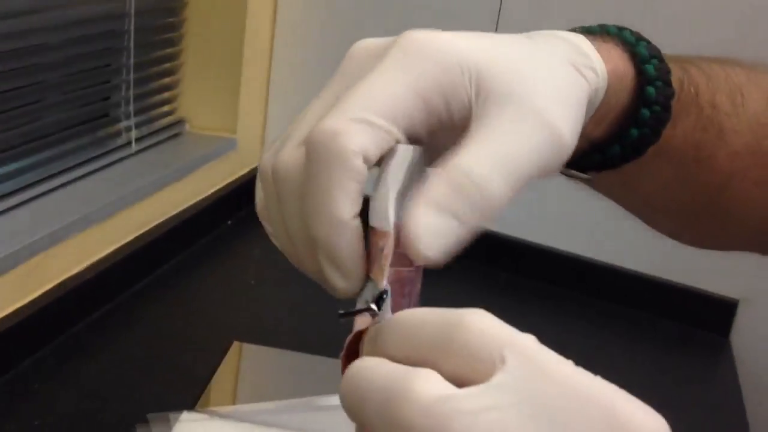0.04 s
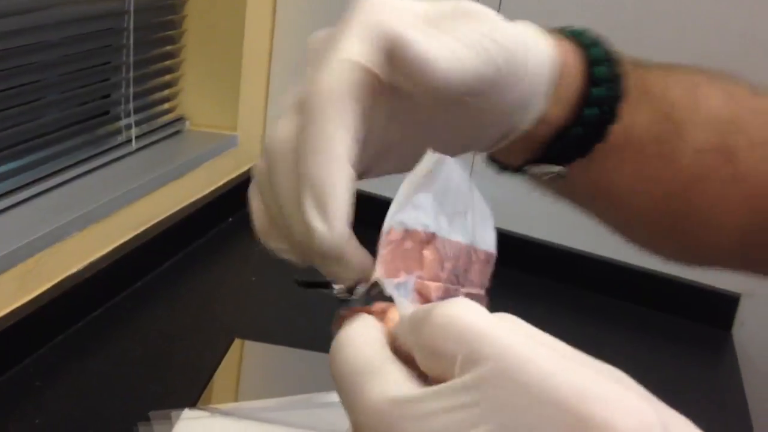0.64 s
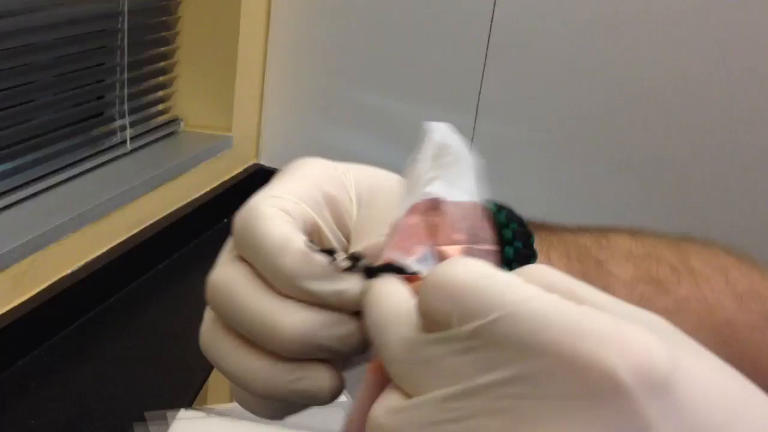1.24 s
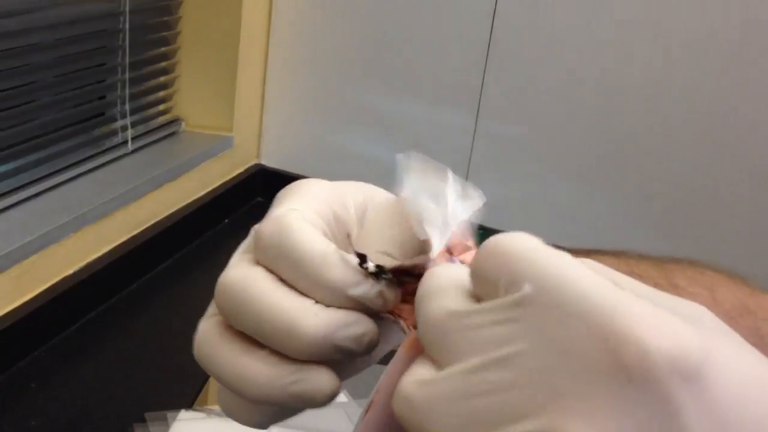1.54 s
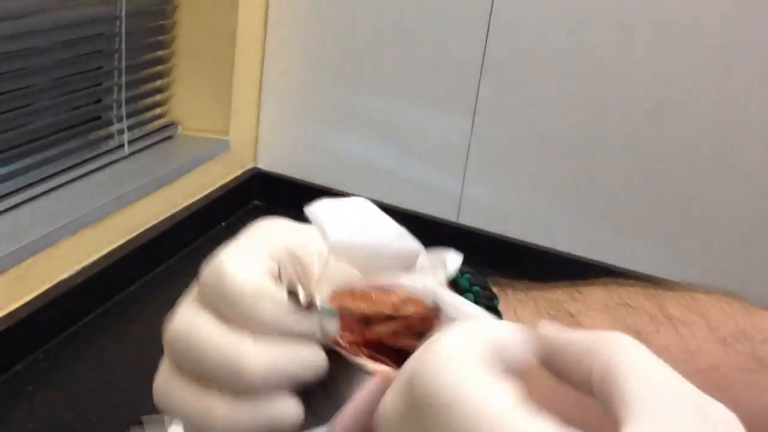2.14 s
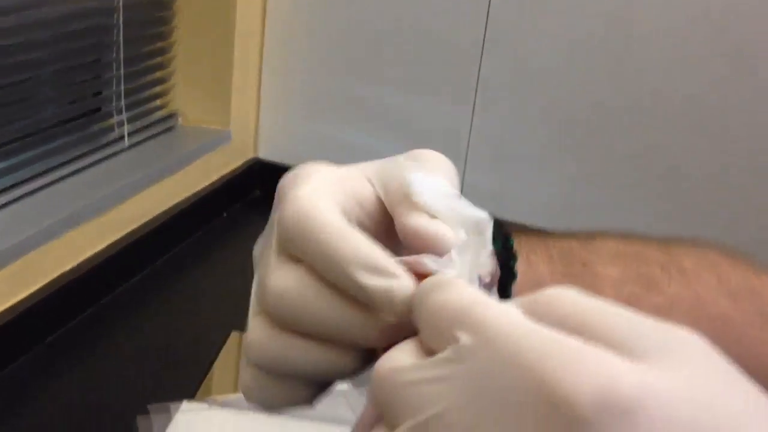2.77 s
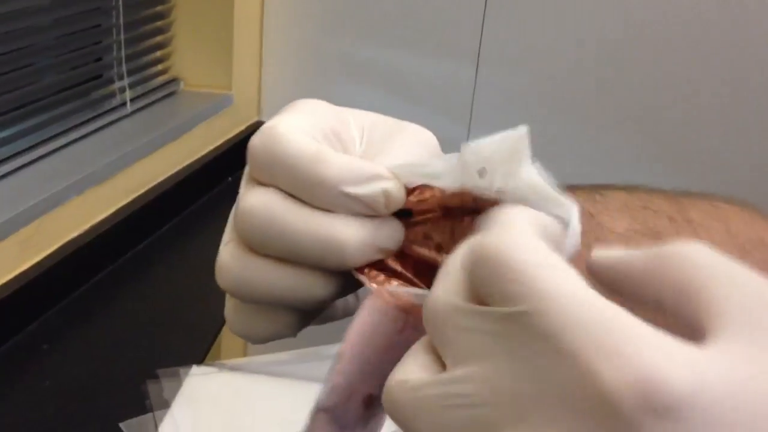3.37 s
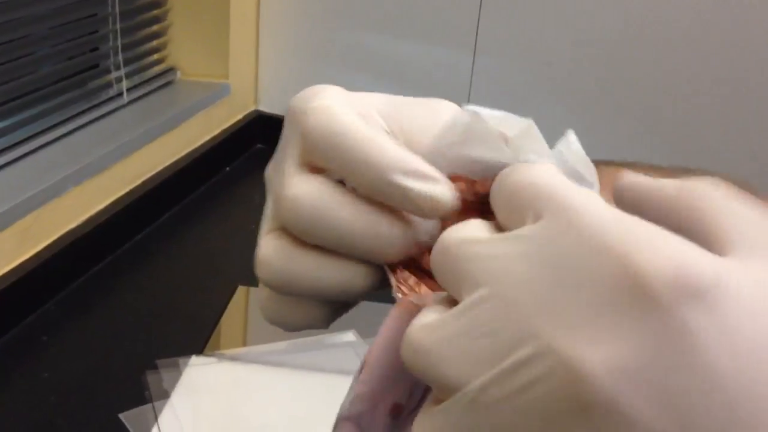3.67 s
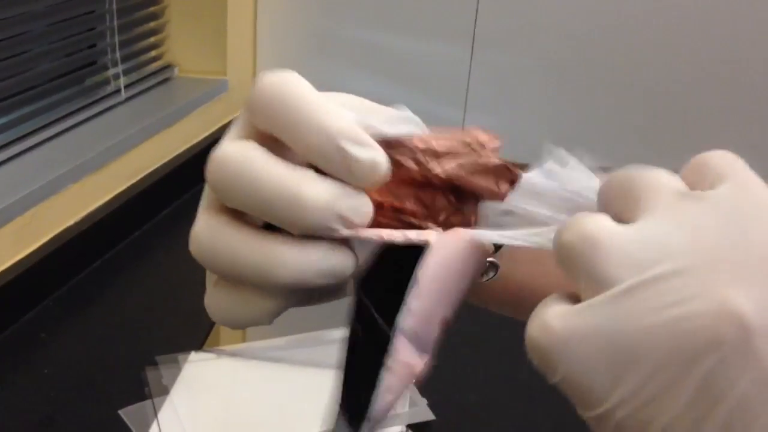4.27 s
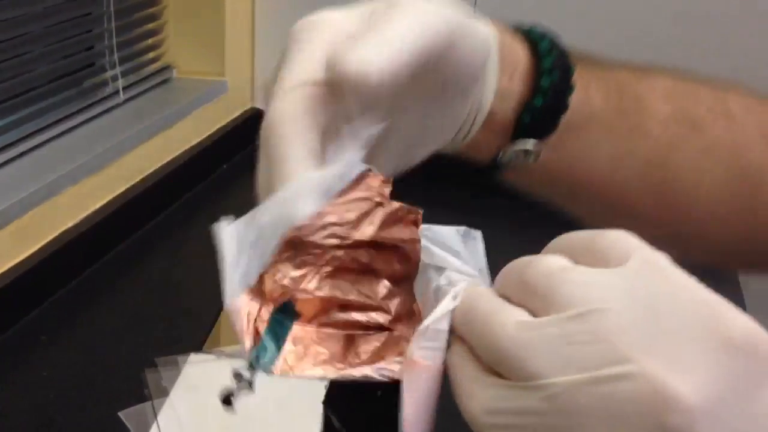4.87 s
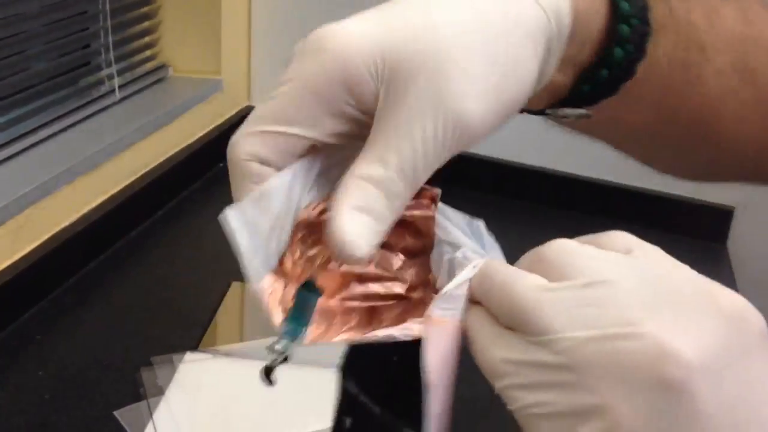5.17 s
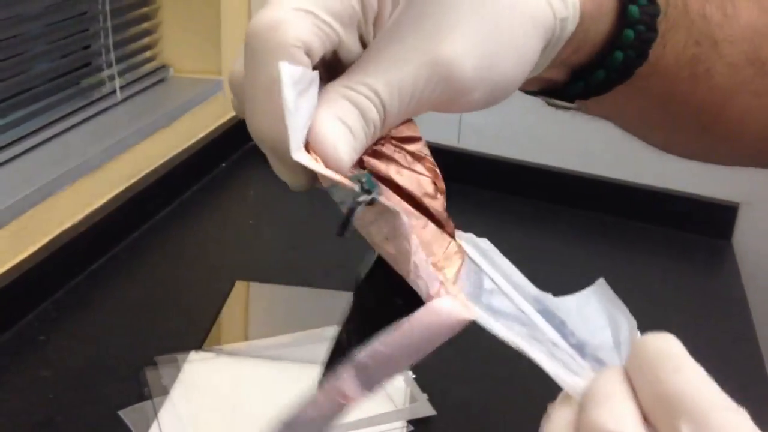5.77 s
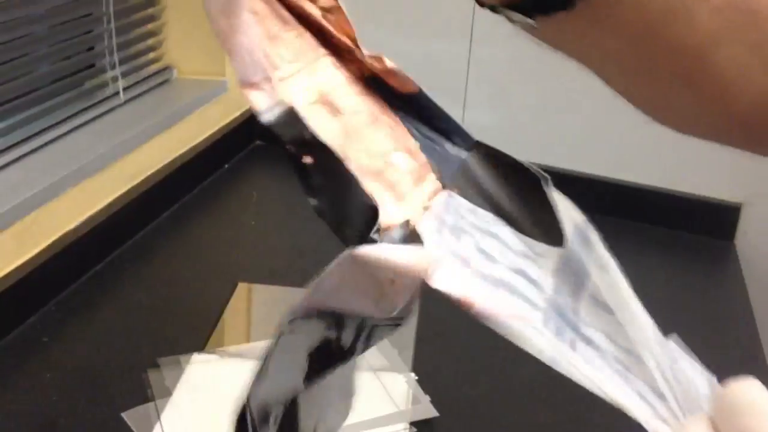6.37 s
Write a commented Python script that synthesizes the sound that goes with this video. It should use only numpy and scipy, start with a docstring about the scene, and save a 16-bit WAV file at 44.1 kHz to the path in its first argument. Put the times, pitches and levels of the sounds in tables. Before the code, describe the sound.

Gloved hands pull apart layers of foil and plastic film, crackling, popping and briefly ripping, close up in a small ventilated room.

```python
"""Gloved hands unfold and part layers of metal foil and plastic film, close to a phone in a small room.
Over a ventilation rumble, a light crackle starts: creases buckle and each click rings its own small facet.
From 1.35 s sharp snaps crowd in and the taut film gives hollow pops. Near 4 s a firm pull swells into a
rip of tiny clicks and rubbing layers. After a lull the handling builds to the loudest crack, near 6 s,
which ducks the phone's gain under the last rustles. Hands, bench and room reflect the foil throughout."""
import sys
import numpy as np
from scipy import signal
from scipy.fft import rfft, irfft
from scipy.io import wavfile
from scipy.ndimage import uniform_filter1d

SR = 44100
rng = np.random.default_rng(int(sys.argv[2]) if len(sys.argv) > 2 else 0)


def store_pcm(level_fs):
    """Save levels as 16-bit WAV."""
    pcm = np.round(np.clip(level_fs, -1, 1) * 32767).astype(np.int16)
    wavfile.write(sys.argv[1], SR, np.atleast_2d(pcm).T)


N = 291689

# Hand moves, from light shifts of grip to firm pulls. Each row: start in seconds, length in seconds,
# crackle level in dB, then low rustle and extra fizz, both in dB relative to the crackle.
HAND_MOVES = [(0.127, 0.039, -46.5, -11, -2), (0.262, 0.173, -45.5, -11, 3), (0.451, 0.21, -48, -12.5, -2),
              (0.85, 0.27, -43.5, -11, 1.5), (1.197, 0.036, -42.5, -10, 9.5), (1.349, 0.26, -42, -10, 6),
              (1.629, 0.405, -37, -11.5, 1), (2.053, 0.12, -44.5, -9, 1.5), (2.304, 0.32, -45, -12.5, -1.5),
              (2.638, 0.105, -41, -9, 1), (2.792, 0.33, -46, -9, 1.5), (3.092, 0.093, -35.5, -7.5, 4),
              (3.188, 0.049, -32.5, -7, -0.5), (3.299, 0.23, -44.5, -8, 0.5), (3.642, 0.29, -44, -7.5, 3.5),
              (3.932, 0.29, -31.5, -7.5, 0.5), (4.221, 0.09, -26, -8, -0.5), (4.382, 0.14, -39.5, -8, 0.5),
              (4.494, 0.15, -47, -4, 2), (4.818, 0.35, -51, -2.5, 5.5), (5.223, 0.26, -39, -10, 3.5),
              (5.462, 0.14, -30, -13.5, 1), (5.598, 0.077, -37.5, -8, 4.5), (5.707, 0.19, -33, -10, 5),
              (5.92, 0.0308, -27, -11, 0), (5.96, 0.13, -31, -12.5, 4), (6.118, 0.29, -35, -6, 2),
              (6.182, 0.15, -29.5, -10.5, -2.5), (6.458, 0.15, -36, -11, 1.5)]
# The main creases that snap through. Each row: start in seconds, dry level in dB,
# time the crease takes in seconds, extra brightness in dB.
CREASE_SNAPS = [(0.173,-41,0.0057,6), (0.859,-42,.0015,7.5), (0.897,-39.5,0.0019,7),
                (0.9451,-36.5,0.00072,9), (1.1528,-38,0.00049,5), (1.192,-30,0.0011,-2),
                (1.354,-34,0.0025,17), (1.3646,-40,.001,7), (1.3871,-36.5,0.00038,-3),
                (1.441,-38,0.00093,-6), (1.485,-37.5,0.0035,11), (1.5303,-36.5,0.00073,-5.5),
                (1.563,-43,.0006,5.5), (1.579,-32,0.0045,5), (1.639,-32.5,0.00047,4), (1.655,-28,.004,16),
                (1.67,-33.5,0.0012,4), (1.693,-31,.007,12), (1.742,-32,.0006,3), (1.7787,-36,0.0031,-2),
                (1.8176,-36,0.0048,12), (1.9276,-31.5,.005,7), (1.9735,-44,0.00055,1.5),
                (1.9849,-29.5,0.0044,16), (2.013,-36,0.00061,3), (2.0709,-34.5,0.0027,14),
                (2.1433,-41.5,.001,11), (2.2778,-38.5,0.00082,2), (2.3164,-39.5,0.0022,5),
                (2.3506,-40,0.00079,6), (2.4615,-41,0.00071,7), (2.533,-43,0.0013,6),
                (2.6589,-37.5,0.0032,4), (2.9761,-41.5,0.0025,3), (3.075,-35.5,0.0022,6.5),
                (3.139,-35.5,0.0056,6), (3.3547,-39,0.00057,6), (3.3883,-38.5,0.0018,12),
                (3.4163,-49,.0007,9), (3.532,-39.5,0.0009,9), (4.12,-28,0.0029,3.5), (4.244,-26,.004,3),
                (4.3078,-28,0.0047,4), (4.682,-44.5,.0008,1), (4.723,-40.5,.0006,3),
                (4.7845,-32.5,0.0011,1.5), (4.8843,-38.5,.0007,2.5), (4.912,-36.5,.006,0),
                (4.9975,-37.5,0.00043,3), (5.087,-39.5,0.00059,-3), (5.127,-36.5,0.003,1.5),
                (5.145,-35.5,0.0011,0), (5.242,-34,0.0069,6), (5.2636,-35,0.0025,14),
                (5.3607,-34.5,0.00055,0), (5.424,-34,.0005,5), (5.4972,-26.5,0.00072,-10),
                (5.504,-28,0.00046,-5), (5.5223,-23,0.00029,-18), (5.548,-31,0.00074,-4),
                (5.564,-31.5,0.0015,15), (5.57,-27.5,0.0018,1.5), (5.6544,-31,0.0023,9),
                (5.6908,-28.5,0.0011,0), (5.8118,-28.5,0.0067,4.5), (5.881,-30,0.01,4),
                (5.955,-19.5,0.00075,-2), (5.9575,-16.5,0.0016,7.5), (6.158,-31,0.0026,1)]
# Hollow pops of the stretched film. Each row: start in seconds, dry level in dB, pitch in Hz.
FILM_POPS = [(1.499,-47,1170), (1.577,-45.5,1530), (1.617,-46,1190), (1.734,-47,1480), (1.871,-44,1710),
             (1.984,-41,780), (2.5967,-39,1465), (2.817,-44,1210), (2.907,-44.5,1490), (3.209,-42,1475),
             (3.227,-42.5,1470), (3.364,-47,960), (3.635,-43,1500), (3.73,-42,1610), (3.984,-43,1270),
             (4.263,-32.5,1670), (4.363,-38,1560), (5.035,-46.5,1700), (5.116,-45,1880), (6.2101,-36,1320),
             (6.361,-37.5,1330), (6.4926,-40.5,1424)]
# Tone of a click, with the microphone port ringing near 5 kHz. Each row: frequency in Hz, relative dB.
CLICK_TONE = [(60, -45), (330, -20.5), (950, -17), (1400, -12), (2050, -10.5), (2750, -13.5), (3800, -7.5),
              (4550, 0), (5150, 1), (6200, -13.5), (7400, -11), (8700, -16.5), (9700, -25.5),
              (12700, -25.5), (15000, -28.5)]
# Tone of the ventilation and its ducts. Each row: frequency in Hz, relative dB.
VENT_TONE = [(25, -44.5), (60, -22), (125, -8), (160, 4), (190, -4.5), (209, 8), (225, -2), (239, 2.5),
             (310, -0.5), (420, -7.5), (900, -16), (9500, -33.5)]

FOLD_HZ = 2480  # below this the broad folds speak, above it the small facets


def crinkle(fizz_hz=6800, rub_db=-7.5):
    """Harder handling buckles more wrinkles a second and evens them into a rip; sliding layers rub."""
    crackle_db, rustle_db, fizz_db = handling()
    effort_db = crackle_db - np.median(crackle_db)
    sheet = clicks(per_s=600 * undb(.8 * effort_db), spread_db=1.0 - 0.031 * effort_db)
    sheet += undb(rub_db) * tinted_noise(CLICK_TONE)
    sheet *= spurts(per_s=130 * undb(effort_db))
    # lesser creases tick at random, and stand out most under a light grip
    tick_gain = undb(1.5 - 0.55 * np.maximum(effort_db, 0))
    sheet = (sheet + tick_gain * clicks(per_s=75, spread_db=1.0)) / np.hypot(1, tick_gain)
    rustle = unit(band(sheet, "lowpass", FOLD_HZ)) * undb(rustle_db)
    crackle = unit(band(sheet, "highpass", FOLD_HZ))
    # the finest wrinkles come and go as the grip shifts
    fizz = band(crackle, "highpass", fizz_hz) * undb(fizz_db + 0.44 * wander(per_s=34))
    return rustle + band(crackle, "lowpass", fizz_hz) * undb(crackle_db) + fizz


def handling(attack_s=0.027, settle_s=0.046, held_db=-63.5, waver_db=1.56):
    """Crackle, rustle and fizz envelopes in dB: a move takes hold, the sheet settles, the grip wavers."""
    t = np.arange(N) / SR
    power = undb(held_db + np.array([[0], [-7.5], [8.5]])) ** 2  # the sheets when merely held
    for start_s, length_s, db, rustle_db, fizz_db in HAND_MOVES:
        rise = np.clip((t - start_s) / attack_s, 0, 1)
        settle = np.exp(-np.maximum(t - start_s - length_s, 0) / settle_s)
        power = power + np.outer(undb([db, db + rustle_db, db + fizz_db]), rise * settle) ** 2
    return 10 * np.log10(power) + waver_db * wander(per_s=16)


def clicks(per_s, spread_db, bright_spread_db=4, facets=48):
    """Random buckling, mostly tiny, now and then larger, over facets from dull to needle-bright."""
    out = np.zeros(N + SR)
    buckles = rng.random(N) < per_s / SR
    which_facet = rng.integers(facets, size=N)
    sizes = rng.choice([-1, 1], N) * undb(spread_db * np.minimum(rng.exponential(size=N), np.pi))
    for k in range(facets):
        ring = facet(body_db=0, bright_db=bright_spread_db * rng.standard_normal(), uneven_db=4.5)
        starts = np.flatnonzero(buckles & (which_facet == k))
        samples = starts[:, None] + np.arange(len(ring))
        out += np.bincount(samples.ravel(), np.outer(sizes[starts], ring).ravel(), len(out))
    return unit(out[:N] / np.sqrt(per_s))


def spurts(per_s, fade_s=0.006, spread_db=4, steady_power=0.3):
    """One wrinkle sets off its neighbours: a gain that jumps and dies away over a steady floor."""
    onsets = rng.random(N) < per_s / SR
    kicks = onsets * undb(2 * spread_db * np.clip(rng.standard_normal(N), -2, 1))
    power = signal.lfilter([1], [1, -np.exp(-1 / (fade_s * SR))], kicks / per_s)
    return unit(np.sqrt(steady_power + power / power.mean()))


def facet(body_db, bright_db, uneven_db, mode_hz=None, flutter_s=0.0027, fold_s=0.0032, size=512):
    """One facet of foil rings for a few milliseconds: the common click tone with bumps of its own."""
    hz, t = np.fft.rfftfreq(size, 1 / SR), np.arange(size) / SR
    bumps_hz = np.geomspace(300, 16000, 22)
    db = tone_db(CLICK_TONE, hz) + uneven_db * np.interp(hz, bumps_hz, rng.standard_normal(len(bumps_hz)))
    shelves = [(550, min(body_db, body_db / 2)), (1400, body_db), (3800, 0), (5400, 0), (7000, bright_db)]
    db += tone_db(shelves, hz)
    if mode_hz is not None:  # the strongest mode stands 8.5 dB proud
        octaves = np.log2((hz + 1) / mode_hz)
        db += 8.5 * (np.exp(-(octaves / 0.21) ** 2) - .5)
    # a folded cepstrum puts the sharp edge first and the ring after it
    cepstrum = irfft(np.log(undb(db)))
    cepstrum[1:size // 2] *= 2
    cepstrum[size // 2 + 1:] = 0
    # short bending waves bounce between the creases just after the edge
    edge = 0.13 * rng.standard_normal(size) * np.exp(-t / flutter_s)
    edge[0] = 1
    # long waves reach the broad folds and ring on for longer
    folds = rng.standard_normal(size) * np.exp(-t / fold_s)
    push = band(unit(edge), "highpass", FOLD_HZ) + band(unit(folds), "lowpass", FOLD_HZ)
    ring = irfft(np.exp(rfft(cepstrum)) * rfft(push))
    return ring / np.linalg.norm(ring)


def snaps_and_pops():
    """The accents: single creases of the foil, and pops of the film with the crease that starts each."""
    out = np.zeros(N + SR)
    for start_s, db, length_s, bright_db in CREASE_SNAPS:
        place(out, start_s, db, crease(length_s, bright_db))
    for start_s, db, hz in FILM_POPS:
        place(out, start_s, db, film_pop(hz))
        place(out, start_s, db + 4, crease(length_s=.005, bright_db=3.5))
    return out[:N]


def crease(length_s, bright_db, ring_hz=4940, scatter_octaves=0.14, slow_s=0.0062, followers=6):
    """A quick crease gives one sharp click; a slow one runs across several facets in a short rasp."""
    mode_hz = ring_hz * 2 ** (scatter_octaves * rng.standard_normal())
    lags_s = 1.5 * length_s * (np.arange(followers) + rng.random(followers)) / followers
    gains = 0.96 * min(length_s / slow_s, 1) * rng.uniform(-1.14, 1, followers)
    body_db = -4.5 + 0.53 * bright_db  # a sharper snap spreads further down as well as up
    out = np.zeros(SR // 10)
    for lag_s, gain in zip(np.r_[0, lags_s], np.r_[1, gains]):
        ring = facet(body_db, bright_db, uneven_db=3.0, mode_hz=mode_hz)
        out[int(lag_s * SR):][:len(ring)] += gain * ring
    return out


def film_pop(hz, ring_s=0.0029, push_s=.0035, width_octaves=0.46, modes=14):
    """A taut patch of film flips in a brief stutter: damped modes round its pitch, too small for bass."""
    t = np.arange(SR // 10) / SR
    octaves = np.linspace(-1.2, .8, modes) + 0.058 * rng.standard_normal(modes)
    gains = rng.choice([-1, 1], modes) / (1 + (octaves / width_octaves) ** 2)
    ring = gains @ np.sin(2 * np.pi * np.outer(hz * 2 ** octaves, t)) * np.exp(-t / ring_s)
    push = rng.standard_normal(len(t)) * np.exp(-t / push_s)
    return band(signal.fftconvolve(ring, push), "highpass", .5 * hz)


def room(x, t60_s=0.34, tail_db=-9.5, near_db=-6.5, near_s=0.009, block=4096):
    """Direct sound, early reflections off hands and bench, and a short room tail."""
    t = np.arange(SR // 3) / SR
    out = np.zeros(N + SR)
    padded = np.pad(x, block)
    near = np.exp(-t / near_s) * (t > .001)
    tail = np.exp(-np.log(1000) * t / t60_s) * (1 - np.exp(-t / 0.0028))
    decay = np.hypot(undb(near_db) * near / np.linalg.norm(near),
                     undb(tail_db) * tail / np.linalg.norm(tail))
    for start in range(0, N + block, block // 2):
        echo = decay * rng.standard_normal(len(t))  # the paths change as the hands move
        echo[0] = 1
        heard = signal.fftconvolve(padded[start:start + block] * np.hanning(block), echo)
        out[start:start + len(heard)] += heard
    return out[block:block + N]


def ventilation(air_db=-49.5, hiss_db=-57, hiss_top_hz=7150):
    """The bed: steady air with low duct resonances, and a faint hiss that rings the microphone port."""
    air = tinted_noise(VENT_TONE) * undb(air_db)
    hiss = band(tinted_noise(CLICK_TONE), "lowpass", hiss_top_hz) * undb(hiss_db)
    return air + hiss


def place(out, start_s, db, sound, span_s=.016):
    """Mix in a short sound; db is its level with the energy spread over span_s."""
    out[int(start_s * SR):][:len(sound)] += undb(db) * np.sqrt(span_s * SR) * sound / np.linalg.norm(sound)


def undb(db):
    """Decibels to gain."""
    return 10 ** (np.asarray(db) / 20)


def unit(x):
    """Scale to rms 1."""
    return x / np.sqrt(np.mean(x ** 2))


def tone_db(curve, hz):
    """Decibels of a (Hz, dB) tone curve at the given frequencies."""
    curve_hz, db = np.transpose(curve)
    return np.interp(np.log(hz + 1), np.log(curve_hz), db)


def tinted_noise(curve):
    """Noise of rms 1 shaped by a tone curve."""
    gains = undb(tone_db(curve, np.fft.rfftfreq(N, 1 / SR)))
    return unit(irfft(rfft(rng.standard_normal(N)) * gains, N))


def band(x, kind, edge_hz):
    """Third-order high- or low-pass."""
    return signal.sosfilt(signal.butter(3, edge_hz, kind, fs=SR, output="sos"), x)


def wander(per_s):
    """A drift of rms 1 that glides between random levels."""
    hold = int(SR / per_s)
    steps = np.repeat(rng.standard_normal(N // hold + 1), hold)
    return unit(uniform_filter1d(steps, hold)[:N])


def scene():
    """Foil and film in the room, over the ventilation; mono."""
    return (room(crinkle() + snaps_and_pops()) + ventilation())[None]


def record(dry, limit_db=-19, attack_s=0.0093, release_db_per_s=5.5, ceiling=0.72, top_hz=15200):
    """The phone ducks after a very loud crack, recovers slowly, rounds the peak and cuts the top."""
    attack = 1 / (attack_s * SR)
    power = signal.lfilter([attack], [1, attack - 1], dry[0] ** 2)
    recovery_db = release_db_per_s * np.arange(N) / SR
    held_db = np.maximum.accumulate(10 * np.log10(power + 1e-18) + recovery_db) - recovery_db
    gain = undb(np.minimum(limit_db - held_db, 0))
    rounded = ceiling * np.tanh(dry * gain / ceiling)
    return signal.sosfilt(signal.ellip(10, .2, 70, top_hz, fs=SR, output="sos"), rounded)


dry = scene()
out = record(dry)
store_pcm(out)
```